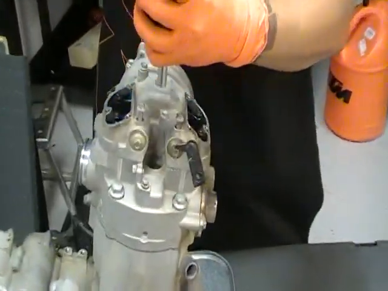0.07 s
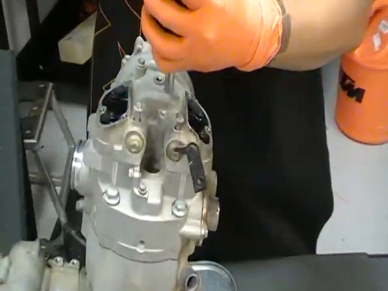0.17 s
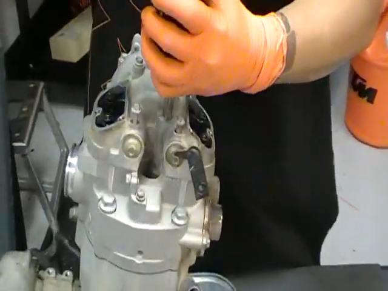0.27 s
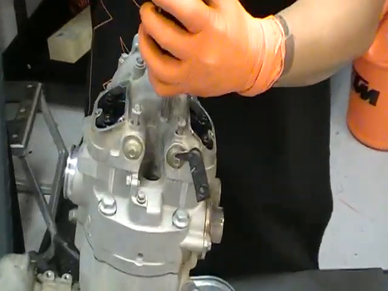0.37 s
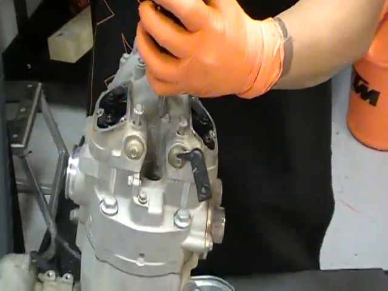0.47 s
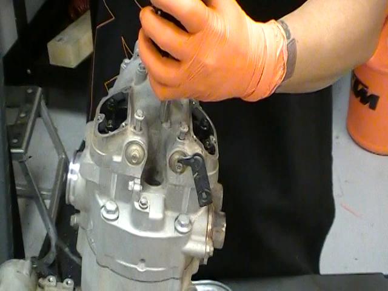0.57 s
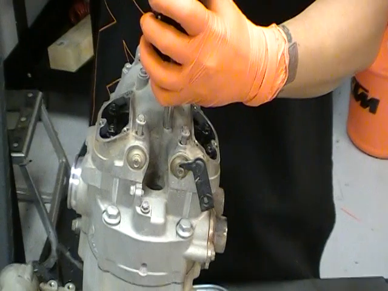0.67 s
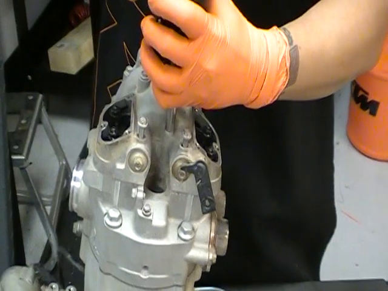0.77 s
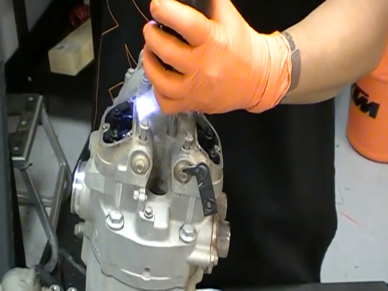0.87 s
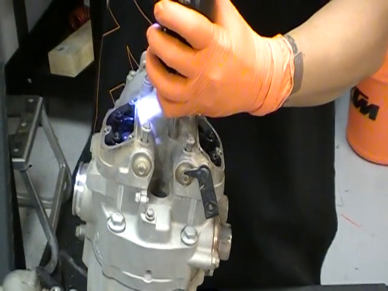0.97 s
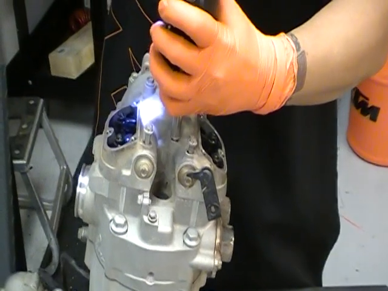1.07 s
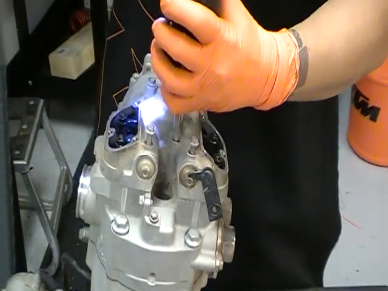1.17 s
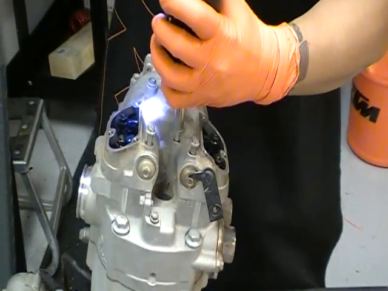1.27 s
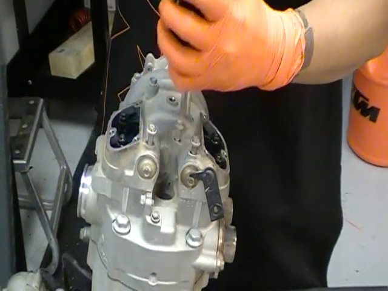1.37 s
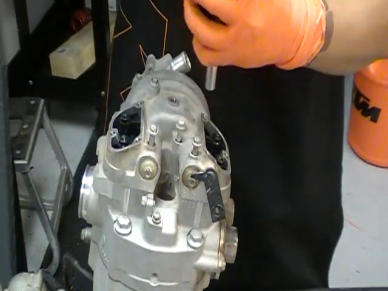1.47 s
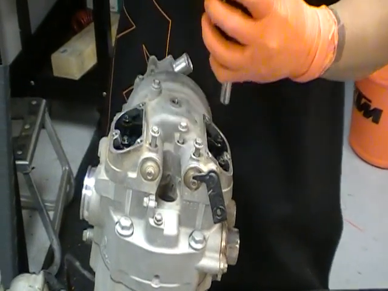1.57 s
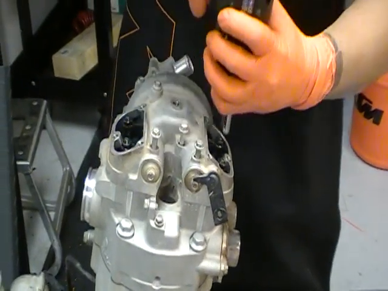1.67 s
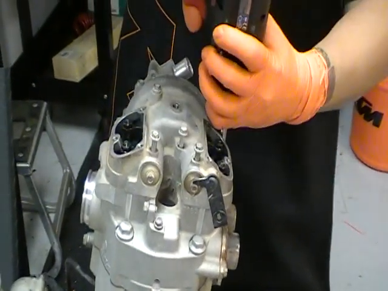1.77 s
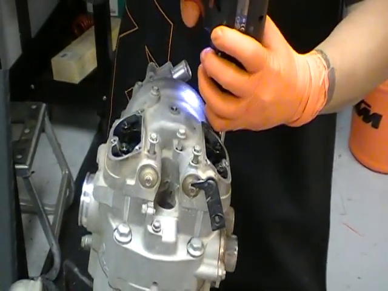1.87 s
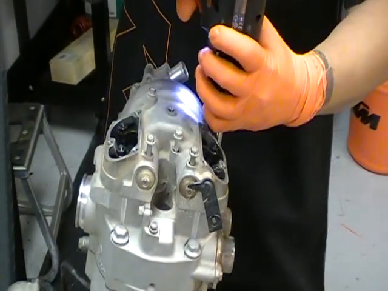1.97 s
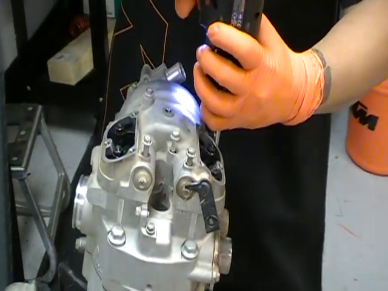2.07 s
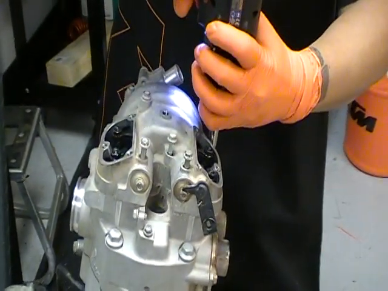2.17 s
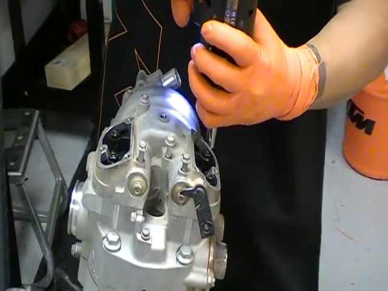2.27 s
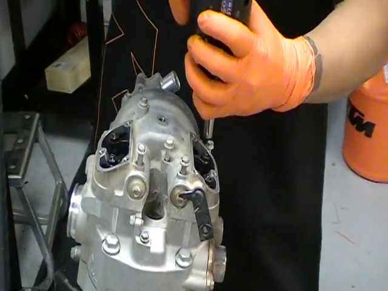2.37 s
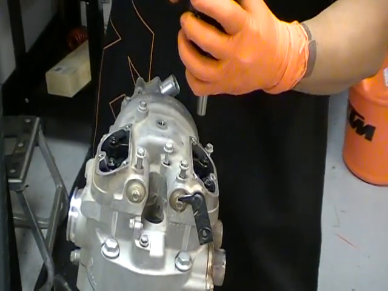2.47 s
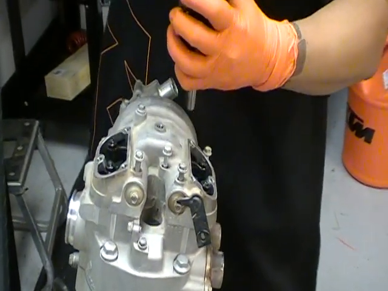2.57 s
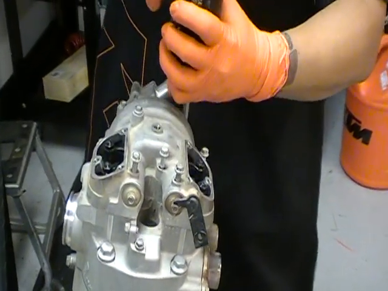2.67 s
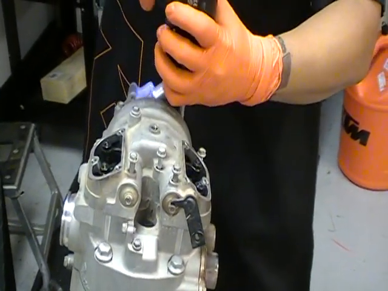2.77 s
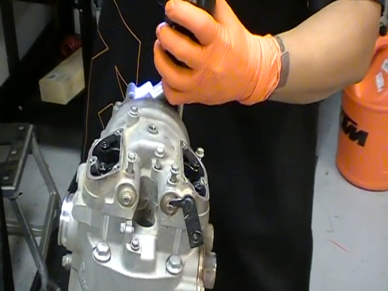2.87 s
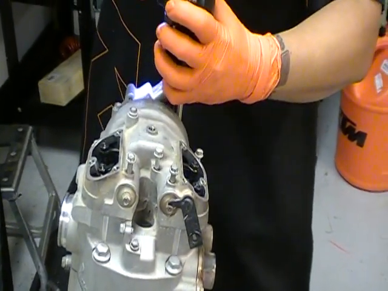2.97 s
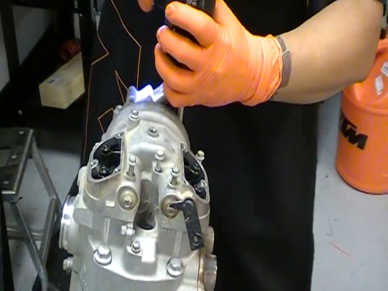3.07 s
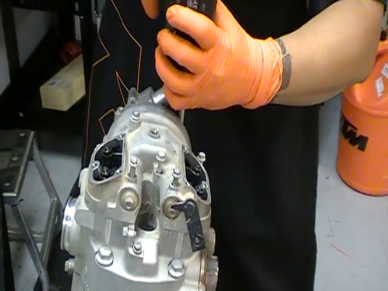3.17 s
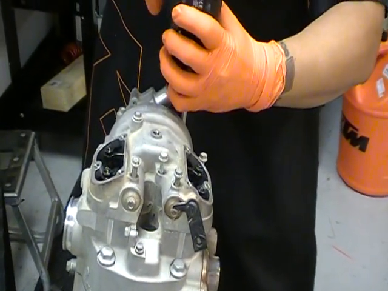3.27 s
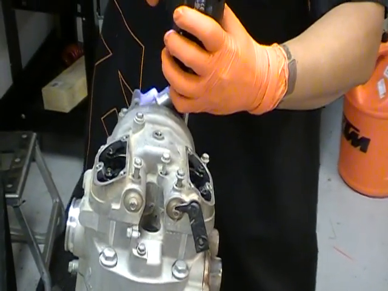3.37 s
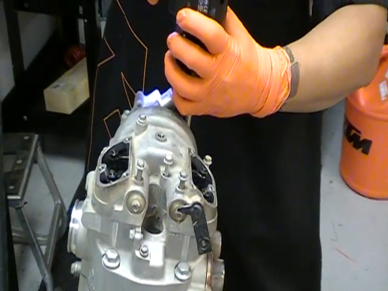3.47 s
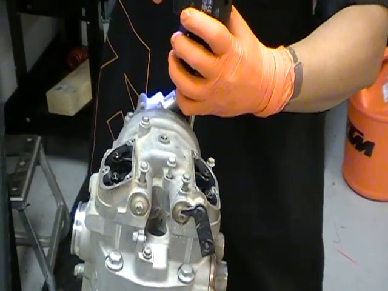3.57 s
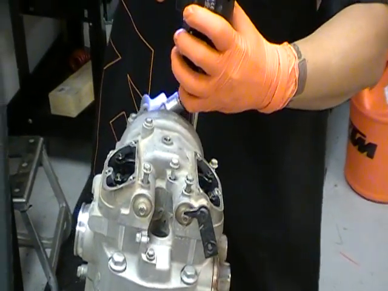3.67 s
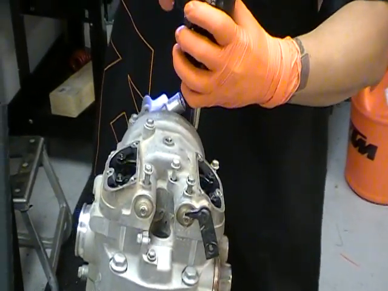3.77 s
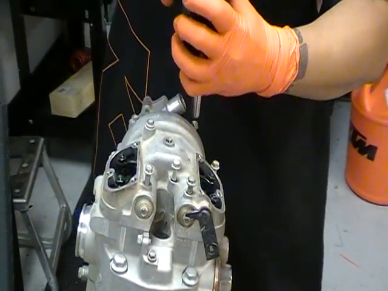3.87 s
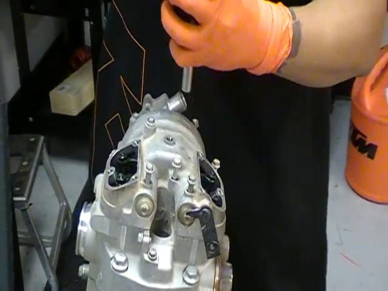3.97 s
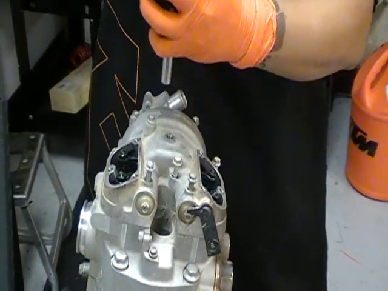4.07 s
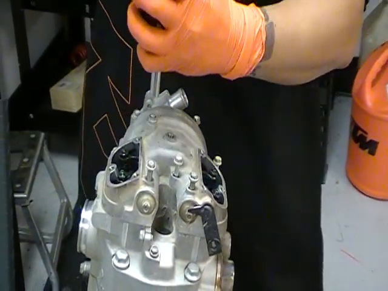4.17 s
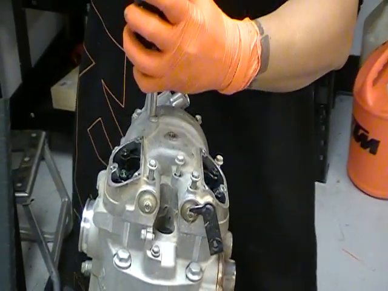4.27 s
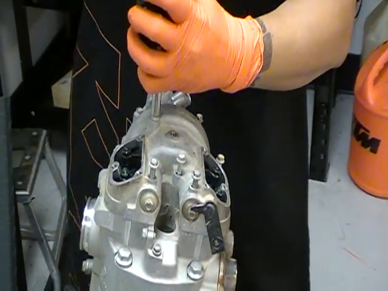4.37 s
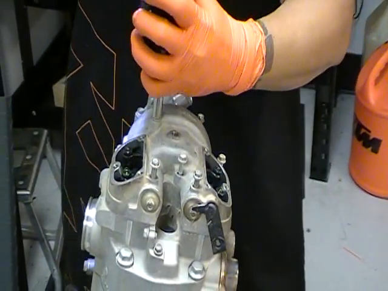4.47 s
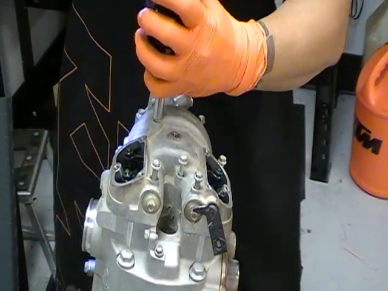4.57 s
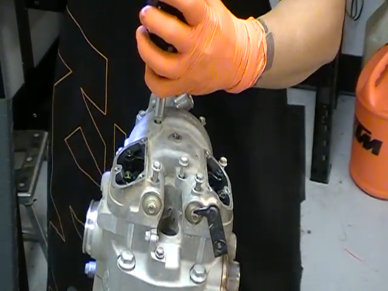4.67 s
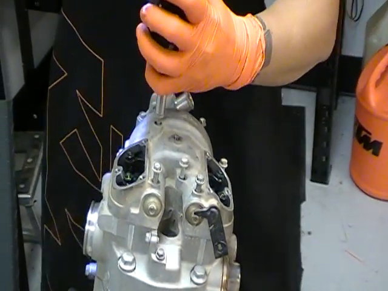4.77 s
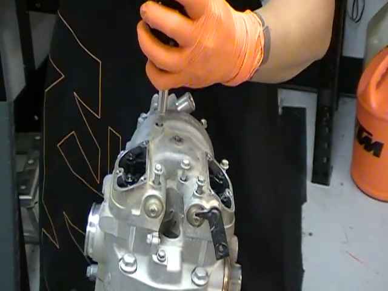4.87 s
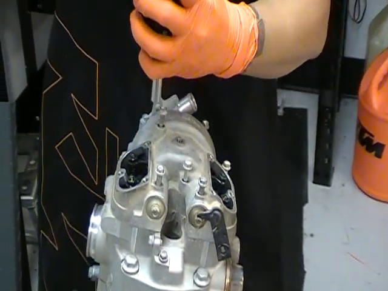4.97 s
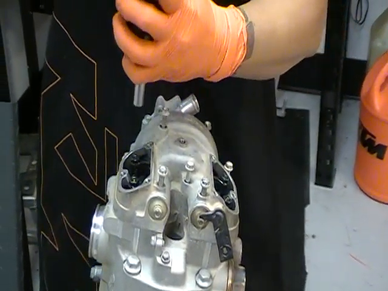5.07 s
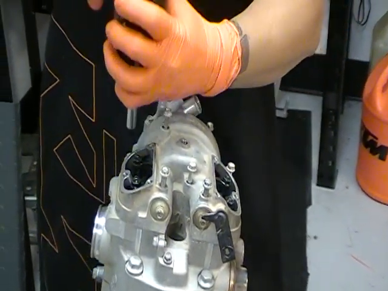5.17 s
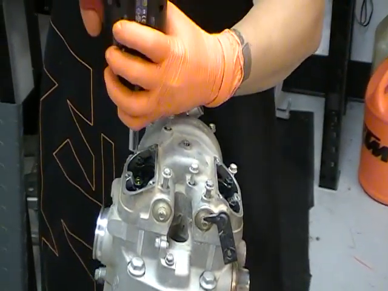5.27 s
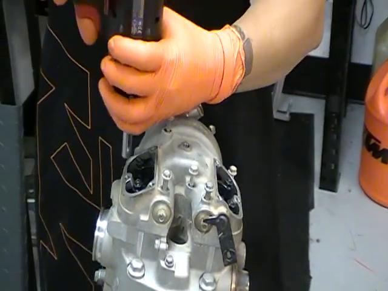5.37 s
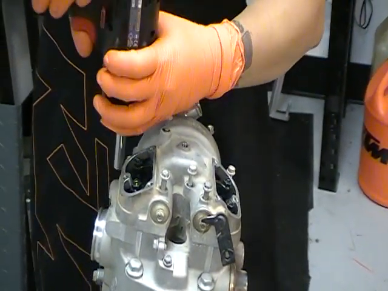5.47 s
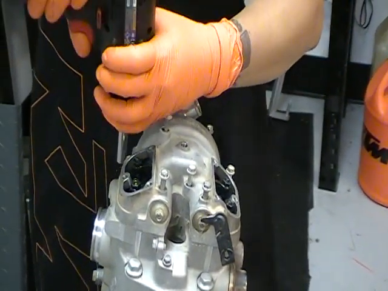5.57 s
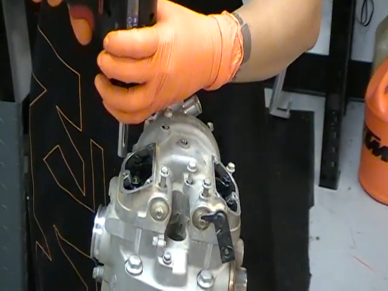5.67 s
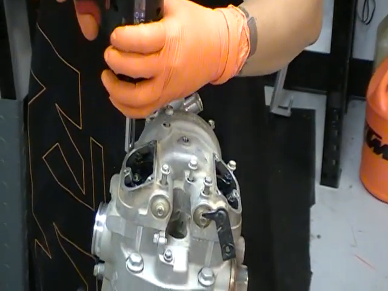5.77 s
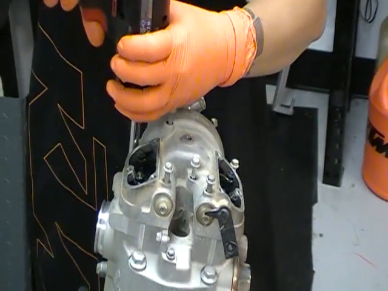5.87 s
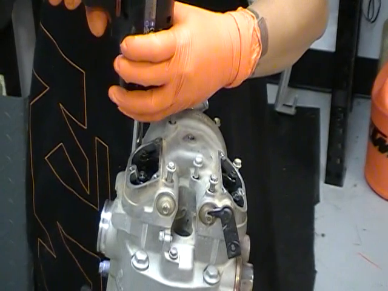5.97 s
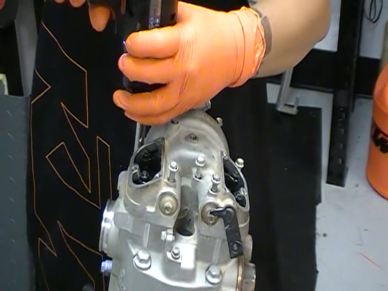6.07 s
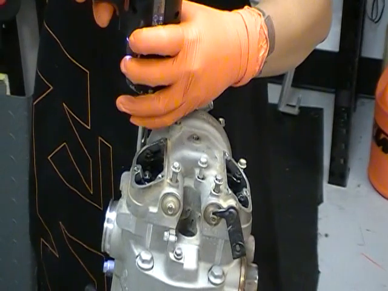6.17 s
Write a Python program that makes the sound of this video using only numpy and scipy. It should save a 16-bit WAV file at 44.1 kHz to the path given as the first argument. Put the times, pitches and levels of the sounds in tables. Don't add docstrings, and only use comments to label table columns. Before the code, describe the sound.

A shrill motor whine from an earlier bolt dies away in a reflective workshop, over rushing air and a low, distant compressor hum. A socket clinks on metal at 0.26 seconds and ticks near 0.7. At 0.85 threads groan and crack, rapid hammer blows quicken, and the driver whines upward, braking sharply near 1.28. Clinks at 1.7 lead to a second burst from 1.86 to 2.3, with light ticking. The socket seats at 2.68; from 2.8 to 3.15 it strains, slips and clatters under a weaker whine. A second try cracks loose at 3.38 and stops at 3.76. After a bright clink at 4.27, another burst runs from 4.43 to 4.85. Background air rises in the pause until clinks at 5.8 and a final burst from 5.95 to 6.35. The close camera microphone clamps down on each blow, then recovers slowly.

```python
import sys
import numpy as np
from scipy import signal
from scipy.fft import rfft, irfft, next_fast_len
from scipy.io import wavfile
from scipy.ndimage import uniform_filter1d, minimum_filter1d, map_coordinates

SR = 44100
rng = np.random.default_rng(int(sys.argv[2]) if len(sys.argv) > 2 else 0)


def wav_out(sig):
    wavfile.write(sys.argv[1], SR, np.round(np.clip(np.atleast_2d(sig).T, -1, 1) * 32767).astype(np.int16))


def amplitude_ratio(level_db):
    exponent = np.asarray(level_db, float) / 20
    return 10 ** exponent


N = 274302
T = np.arange(N) / SR

# (start [s], trigger release [s], top gear whine [Hz])
FREE_RUNS = [
    (.97, 1.277, 6700),
    (1.975, 2.277, 6690),
    (3.47, 3.762, 6530),
    (4.535, 4.847, 6690),
    (6.045, 6.35, 6500),
]
# (whine [dB], noise [dB])
RUN_OFFSETS = [(-1.5, -0.5), (-2.3, -0.5), (-1.3, 0.7), (0.1, 1.6), (-0.3, 1.5)]
# (at release [dB], growth [dB/s], power of the speed [1])
GROWTH = [(-28, 43.5, 4.5), (-35, 36.5, 1), (-41, 39.5, -0.5)]
# (time after release [s], speed share [1], whine [dB], noise [dB])
BRAKE = [(0, 0.97, -2, -2.5), (.012, 1, -1.5, 2), (.045, .63, -14, -8), (.065, .47, -24, -20),
         (.1, .3, -55, -43)]
# (time [s], gear whine [Hz], whine [dB])
LOADED_RUN = [(2.85, 4300, -40), (2.89, 4950, -41), (2.94, 5500, -40), (2.97, 5750, -52), (3.0, 5960, -37),
              (3.05, 6250, -36), (3.085, 6350, -38), (3.11, 6350, -60)]
LOADED_WHIRR_DB, LOADED_HOUSING_DB = -39, -42
# (multiple of the whine [1], level [dB])
ORDERS = [(1 / 15, -39), (1 / 5, -23), (4 / 15, -27), (1 / 3, -14), (2 / 3, -22), (1, 0), (4 / 3, -22),
          (5 / 3, -15)]
# (frequency [Hz], density [dB per Hz])
WHIRR = [(2500, -43), (4000, -5), (5700, -8.5), (7000, -6.5), (8500, -1), (10600, 0.5), (13000, -1),
         (15000, -13), (17000, -27)]
# (frequency [Hz], density [dB per Hz])
HOUSING = [(150, -64), (250, -40.5), (342, -62), (429, -27.5), (640, -21), (1280, -10), (1600, -9),
           (2130, -4), (5000, -14), (6500, -42), (11000, -120)]

# (first blow [s], first gap [s], steel peak [dB], casting peak [dB], loss per blow [dB])
HAMMER = [
    (.8811, .0283, 0, -10, 2.8),
    (1.8981, .0264, 0, -4, 4.3),
    (3.3842, .03, -0.5, -8, 2.8),
    (4.4571, .0268, -3.5, -11, 1.2),
    (6.0138, .0219, -3, -11, 3),
]
QUICKEN = .87
# (peak [s], held [s], groan [dB], grit [dB], free [s])
BOLTS = [
    (0.852, 0.017, -20.5, -28.5, 0.93),
    (1.883, 0.0083, -22, -26.5, 1.95),
    (2.808, 0.016, -19.5, -23.5, 2.956),
    (2.9, 0.22, -32.5, -28, 3.17),
    (3.383, 0.0041, -26.5, -29.5, 3.48),
    (4.444, 0.0037, -22.5, -26.5, 4.564),
    (5.81, .03, -40, -42.5, 5.89),
    (5.961, 0.023, -18.5, -24, 6),
]
WIND_UP_S, SLIP_S = 0.044, 0.027
WIND_UP_DB, SLIP_DB, SLACK_DB = (-27, -25.5), (-13, -6), (-16, -7.5)
# (frequency [Hz], density [dB per Hz])
GROAN = [(59, -70), (100, -40), (358, -21.5), (636, -10.5), (926, -9), (1330, -2), (1970, 0), (3850, -4.5),
         (5000, -20.5), (6500, -45), (11000, -120)]
# (frequency [Hz], density [dB per Hz])
GRIT = [(1760, -60), (3000, -15.5), (5100, -7), (6030, -5), (7030, -8), (7770, -1.5), (11000, -5.5),
        (12600, -2.5), (14900, -16)]
# (time [s], steel peak [dB], casting peak [dB])
CRACKS = [(.8419, -20, -16), (.8498, -9, -10), (.8547, -2, -3), (.8715, -11, -7), (.8778, -3, -13),
          (.894, -14, -17), (.8972, -12, -25), (1.8553, -3, -13), (1.8796, -9, -4), (1.8875, -6, -6),
          (2.7877, -18, -23), (2.809, -8, -13), (2.8203, -4, -15), (2.831, 0, -9), (2.847, -10, -11),
          (3.3758, -13, -21), (3.3977, -11, -23), (4.4246, 0, -14), (4.4317, -14, -19), (4.4424, -4, -9),
          (4.4475, -1, -11), (5.9311, -24, -21), (5.9576, -5, -10), (5.9647, -8, -5), (5.9755, -12, -9),
          (5.9855, -2, -15), (6.0054, -10, -19)]
# (time [s], steel peak [dB], casting peak [dB], steel centre [Hz], casting centre [Hz])
CLINKS = [(0.2578, -9, -13.5, 10400, 1290), (0.5925, -22, -26.5, 8400, 2000),
          (0.7125, -15.5, -19.5, 7500, 2300), (0.7814, -25.5, -30, 9500, 1600),
          (1.7062, -10.5, -15, 8500, 3000), (1.7101, -11, -18.5, 9700, 1500),
          (2.0293, -24, -44, 10900, 2800), (2.0647, -20, -42, 10400, 2900), (2.0935, -22, -40, 10600, 2600),
          (2.1214, -12.5, -39, 10900, 2700), (2.154, -15, -35, 11000, 2300), (2.6, -36, -38, 8700, 2500),
          (2.6754, -10, -16.5, 9600, 1500), (2.6799, -10, -13.5, 9400, 1800),
          (3.1733, -23, -16.5, 9300, 3000), (3.1928, -34, -22, 8400, 2700), (4.268, -2, -17.5, 8600, 4200),
          (5.8035, -13.5, -16.5, 7200, 3000), (5.8306, -23, -25, 8000, 1600),
          (6.1987, -17.5, -36, 8800, 3100)]
# (time [s], steel peak [dB])
RATTLE = [(2.8626, -1), (2.8735, -9), (2.8795, -8), (2.8862, -6), (2.8997, -5), (2.9091, -3), (2.9192, -6),
          (2.9412, -5), (2.9471, -8), (2.9716, -6), (2.9765, -4), (3.0009, -7), (3.0342, -6), (3.0481, -7),
          (3.0571, -7), (3.0634, -5), (3.076, -5), (3.09, -7), (3.1497, -10)]
RATTLE_BODY_DB, LIGHT_DB, LIGHT_SPAN_S = -20, -12, (2.92, 3.16)
# (chatter [dB], steel spread [octaves], steel centre [Hz], casting centre [Hz])
SEAT, CRACK = (-9, 0.45), (-16.5, .35, 9560, 2650)
STRIKE, KNOCK = (-12.5, 0.5, 10058, 4050), (-21, .25, 8500, 3200)
# (frequency [Hz], width [Hz], level [dB])
SOCKET = [(5760, 3200, 3.5), (8050, 1510, -0.5), (8800, 1040, 0), (10400, 1290, -2.5), (11790, 1080, -0.5),
          (12650, 1650, -3)]
# (frequency [Hz], width [Hz], level [dB])
CASTING = [(740, 300, -20), (1196, 340, -3.5), (1914, 214, 1), (2630, 900, -3.5), (3620, 940, 1),
           (5110, 1540, -2.5)]

# (frequency [Hz], t60 [s])
WALLS = [(300, 0.38), (2000, 0.45), (6500, 0.38), (13000, 0.19)]
# (frequency [Hz], density [dB per Hz])
SHOP = [(60, -54), (150, -26.5), (260, -16), (660, -3.5), (1400, -3.5), (3000, -10.5), (6400, -20),
        (7800, -14.5), (9000, -8), (11000, -13), (13400, -25), (15000, -13.5)]
# (multiple of its hum [1], level [dB])
HUM = [(2, -73.5), (3, -77), (4, -54.5), (5, -68), (6, -60), (7, -64.5), (8, -55), (9, -57.5), (10, -63),
       (12, -51), (14, -56), (15, -70.5), (16, -54.5)]
HUM_HZ = 55.62

# (time [s], gain [dB])
DUCKS = [(-.05, -20), (.27, -10.5), (.85, -30.5), (1.27, -18.5), (1.71, -1.5), (1.87, -28.5), (2.27, -17.5),
         (2.68, -6), (2.8, -5.5), (2.95, -17.5), (3.08, -15.5), (3.19, -15.5), (3.369, -28), (3.77, -16),
         (4.27, -8), (4.43, -28), (4.84, -15.5), (5.95, -19), (6.04, -25.5)]
DUCK_S, DUCK_HOLD_S, RECOVER_DB_PER_S, SETTLE_S = 0.037, 0.12, 37, 0.071
# (treble level [dB], band limit [Hz])
BAND = [(-200, 12900), (-56, 13700), (-42, 14500), (-36.5, 15250), (-21, 16000)]
# (frequency [Hz], level [dB])
APART = [(300, -48), (2000, -38.5), (5000, -31), (14000, -35.5)]


def motor():
    runs = [free_run(*run, *offsets) for run, offsets in zip(FREE_RUNS, RUN_OFFSETS)]
    loaded = [(*row, LOADED_WHIRR_DB, LOADED_HOUSING_DB) for row in LOADED_RUN]
    hz, whine_db, whirr_db, housing_db = played(sorted([*runs, loaded]), (3999.5, -96, -92, -90))
    hz = uniform_filter1d(hz, size=500)
    turn = 2 * np.pi * np.cumsum(hz) / SR
    whine = 0
    for k, db in ORDERS:
        flutter = (.6 + .15 * (k < 1)) * wobble(120)
        whine = whine + amplitude_ratio(db + 3 * wobble(90)) * np.sin(k * turn + flutter)
    octave = amplitude_ratio(2.5 * wobble(90) - 2.5) * np.sin(2 * turn + .6 * wobble(120))
    whirr = noise(WHIRR, grain_db=-1.5, rate=1600) * (1 + 0.69 * np.sin(turn / 15))
    housing = amplitude_ratio(housing_db + 3) * noise(HOUSING, grain_db=1, rate=170)
    return amplitude_ratio(whine_db + 6.5) * whine + amplitude_ratio(whirr_db + 6.0) * (whirr + octave) + housing


def free_run(start, release, top_hz, tone_db, noise_db):
    s = np.linspace(0, release - start - .002, 12)
    speed = 1 - .306 * np.exp(-s / .099)
    whine, whirr, housing = [db + rate * (s - s[-1]) + power * 20 * np.log10(speed)
                             for db, rate, power in GROWTH]
    rows = list(zip(start + s, top_hz * speed, whine + tone_db, whirr + noise_db, housing + noise_db))
    _, hz, a, b, c = rows[-1]
    return rows + [(release + s, hz * share, a + tone, b + db, c + db) for s, share, tone, db in BRAKE]


def blows():
    out, t = np.zeros(N + 4096), np.arange(4096) / SR
    for s, steel_db, body_db, chatter_db, octaves, steel_hz, body_hz in contacts():
        crack, chatter = amplitude_ratio(-60 * t / .004), amplitude_ratio(chatter_db + 8 - 60 * t / .03)
        burst = rng.standard_normal(len(t)) * (crack + chatter)
        burst[0] = 4.2
        spread = rng.normal(0, 1, (2, 2, 6))
        steel_hz = steel_hz * (1 + .06 * rng.normal())
        steel = filtered(burst, struck(SOCKET, steel_hz, octaves, spread[0]))
        body = filtered(burst, struck(CASTING, body_hz, 1.7, spread[1]))
        steel = amplitude_ratio(steel_db + 0.17) * steel / abs(steel).max()
        body = amplitude_ratio(body_db - .4) * body / abs(body).max()
        out[round(s * SR) - 8:][:len(t)] += steel + body
    return filtered(out[:N], lambda f: (1j * f / (350 + 1j * f)) ** 2)


def contacts():
    rows = [(s, a, b, *SEAT, *hz) for s, a, b, *hz in CLINKS] + [(*row, *CRACK) for row in CRACKS]
    for (s, gap, a, b, loss), (free, *_) in zip(HAMMER, FREE_RUNS):
        while s < free:
            rows.append((s, a, b, *STRIKE))
            s, gap, a, b = s + gap, gap * QUICKEN, a - loss, b - loss
    luck = rng.random((12, 2))
    slot = (np.arange(len(luck)) + luck[:, 0]) / len(luck)
    light = zip(LIGHT_SPAN_S[0] + np.ptp(LIGHT_SPAN_S) * slot, LIGHT_DB + 4 * (luck[:, 1] - .5))
    return rows + [(s, db, RATTLE_BODY_DB + 0.36 * (db + 5.5), *KNOCK) for s, db in [*RATTLE, *light]]


def struck(modes, centre, octaves, spread):
    moved = []
    for (c, width, db), shift, luck in zip(modes, *spread):
        off_centre = np.log2(c / centre) / octaves
        moved.append((c * (1 + 0.038 * shift), width, db + 2.14 * luck - 6 * off_centre ** 2))
    return lambda f: resonances(moved, f)


def strain():
    def shape(s, held, free, k):
        times = [s - WIND_UP_S - .015, s - WIND_UP_S, s, s + held, s + held + SLIP_S, free, free + 0.014]
        return np.interp(T, times, [-70, WIND_UP_DB[k], 0, 0, SLIP_DB[k], SLACK_DB[k], -70])

    levels = [[groan + shape(s, held, free, 0), grit + shape(s, held, free, 1)]
              for s, held, groan, grit, free in BOLTS]
    groan_db, grit_db = np.max(levels, axis=0)
    groan = amplitude_ratio(groan_db - 1) * noise(GROAN, grain_db=2.5, rate=380)
    return groan + amplitude_ratio(grit_db + 4) * noise(GRIT, grain_db=3.5, rate=300)


def walls(x):
    hz, t, z = signal.stft(rng.standard_normal(SR), SR, nperseg=256)
    tail = signal.istft(z * amplitude_ratio(-60 * t / along(WALLS, hz)[:, None]), SR, nperseg=256)[1]
    tail *= 1 - np.exp(-np.arange(len(tail)) / 450)
    return signal.fftconvolve(np.pad(x, (90, 0)), tail / np.linalg.norm(tail))[:N]


def earlier_whine():
    peak = [(6150, -42), (6350, -18), (6520, -19), (6650, -60)]  # (Hz, dB)
    ring = filtered(rng.standard_normal(N), lambda f: amplitude_ratio(along(peak, f)))
    whirr = noise(WHIRR, grain_db=-2, rate=90)
    return amplitude_ratio(-27.5 - 60 * T / 0.33) * unit(ring) + amplitude_ratio(-39 - 60 * T / 0.23) * whirr


def shop():
    turn = 2 * np.pi * np.cumsum(HUM_HZ * (1 + 0.00217 * wobble(3.05))) / SR
    hum = 0
    for k, db in HUM:
        drift = amplitude_ratio(1.1 * wobble(9)) * np.sin(k * turn + .1 * k * wobble(12))
        hum = hum + amplitude_ratio(db + 1.5) * drift
    return amplitude_ratio(-36.0) * noise(SHOP, grain_db=-1.8, rate=9) + hum * gain() ** 0.23


def gain():
    t = T[::SR // 1000]
    ducks = []
    for s, db in DUCKS:
        down = s + DUCK_S
        up = down + DUCK_HOLD_S
        ducks.append(np.interp(t, [s, down, up, up - db / RECOVER_DB_PER_S], [0, db, db, 0]))
    settled = uniform_filter1d(np.min(ducks, axis=0), size=round(SETTLE_S * 1000))
    return amplitude_ratio(np.interp(T, t, settled))


def band_limit(x):
    hz, _, z = signal.stft(x, SR, nperseg=1024)
    power = np.sum(abs(z[(hz > 8000) & (hz < 11000)]) ** 2, 0)
    treble = 10 * np.log10(1.33 * power + 1e-15)
    treble = -minimum_filter1d(-uniform_filter1d(treble, size=3), size=2)
    level, top = np.transpose(BAND)
    limit = top[np.searchsorted(level, treble) - 1]
    return signal.istft(z * (hz[:, None] < limit), SR, nperseg=1024)[1][:N]


def unit(x):
    return x / np.sqrt(np.mean(x ** 2) + 1e-20)


def along(points, hz):
    f, v = np.transpose(points)
    return np.interp(np.log(hz + 1), np.log(f + 1), v)


def played(tables, silent):
    rows = []
    for table in tables:
        rows += [(table[0][0] - .015, *silent), *table, (table[-1][0] + .015, *silent)]
    s, *cols = np.transpose(rows)
    return [np.interp(T, s, c) for c in cols]


def wobble(rate):
    return map_coordinates(rng.standard_normal(int(N * rate / SR) + 4), [T * rate])


def filtered(x, response):
    m = next_fast_len(len(x) + 8192)
    return irfft(rfft(x, m) * response(np.fft.rfftfreq(m, 1 / SR)), m)[:len(x)]


def noise(spectrum, grain_db, rate):
    lumpy = rng.standard_normal(N) * amplitude_ratio(grain_db * wobble(rate))
    return unit(filtered(lumpy, lambda hz: amplitude_ratio(along(spectrum, hz))))


def resonances(modes, f):
    return sum((-1) ** k * amplitude_ratio(db) * 1j * f * w / (c * c - f * f + 1j * f * w)
               for k, (c, w, db) in enumerate(modes))


def scene():
    drive, knocks = (motor() + strain()) / gain(), blows() / gain()
    room = walls(amplitude_ratio(-9.5) * drive + amplitude_ratio(-12.5) * knocks)
    mono = drive + knocks + room + shop() + earlier_whine()
    return np.array([mono, mono])


def top_cut(x):
    return signal.sosfilt(signal.butter(12, 16440, fs=SR, output="sos"), x)


def record(dry):
    x = dry[0] * gain()
    x = band_limit(x / (1 + abs(x / .97) ** 8) ** (1 / 8))
    side = filtered(x * wobble(300), lambda hz: amplitude_ratio(along(APART, hz)))
    return top_cut(np.array([x + side, x - side]))


dry = scene()
out = record(dry)
wav_out(out)
```